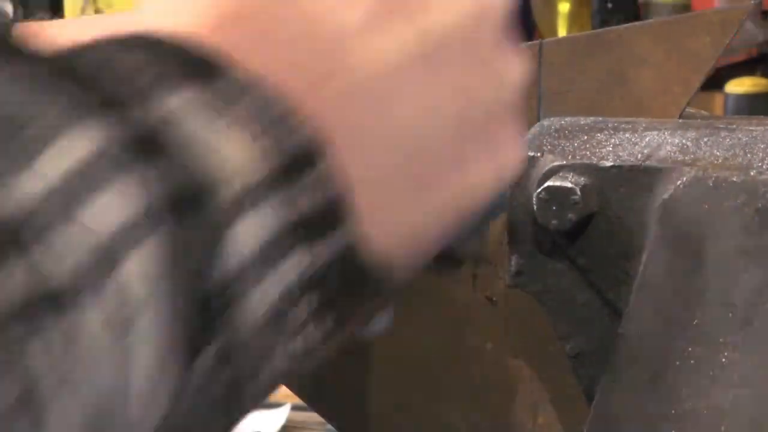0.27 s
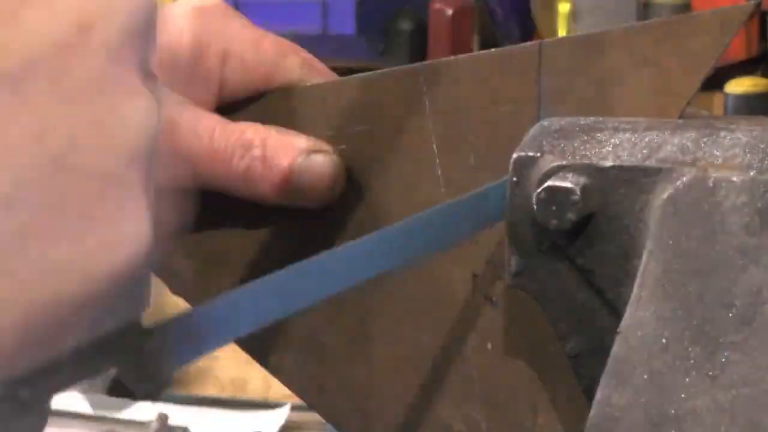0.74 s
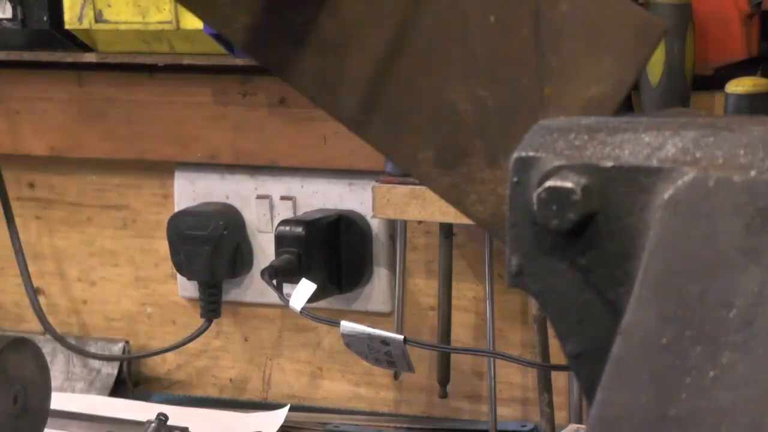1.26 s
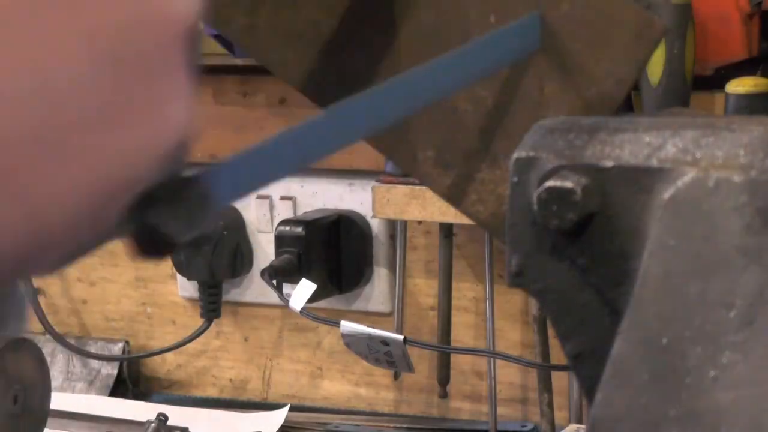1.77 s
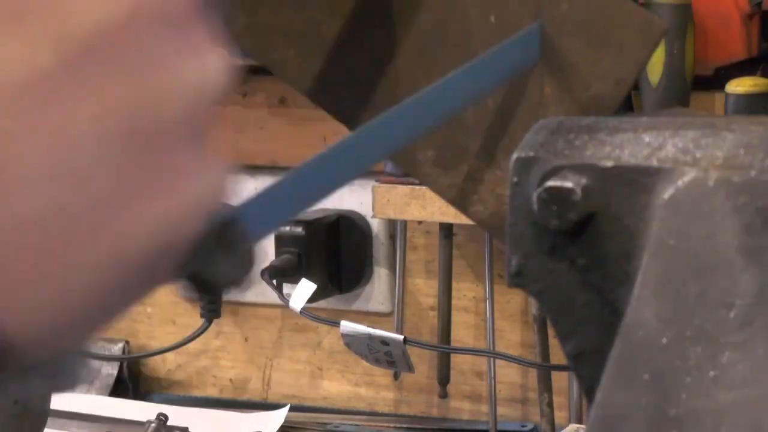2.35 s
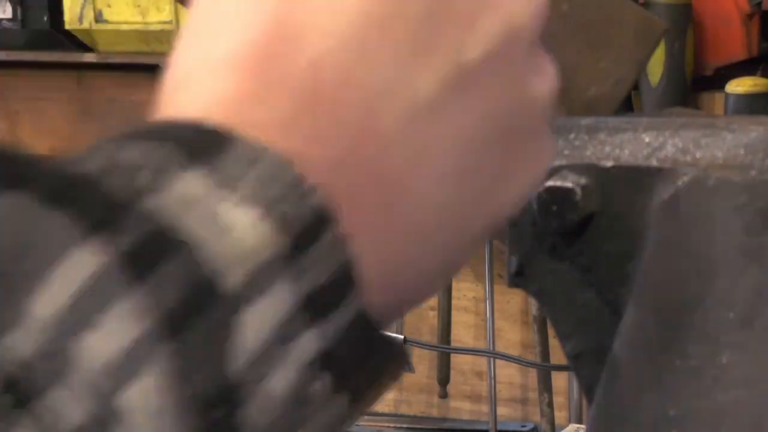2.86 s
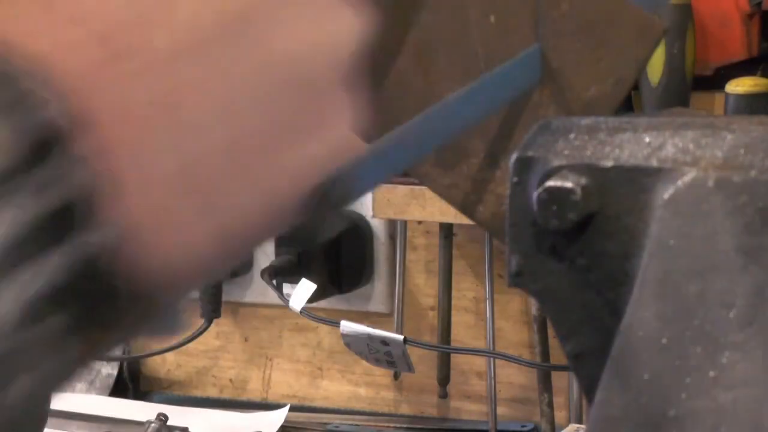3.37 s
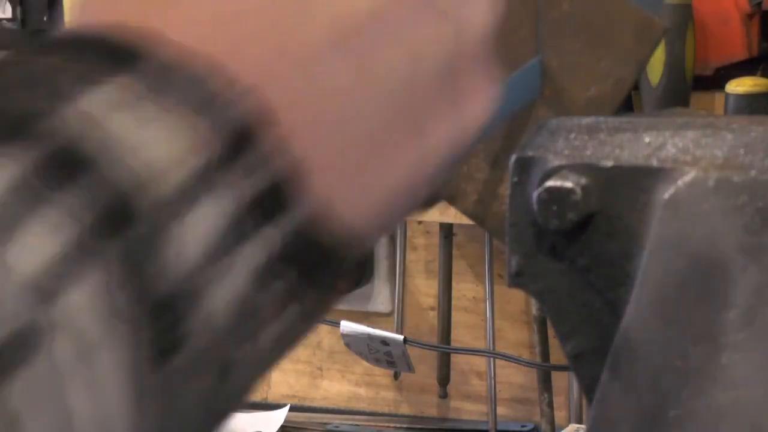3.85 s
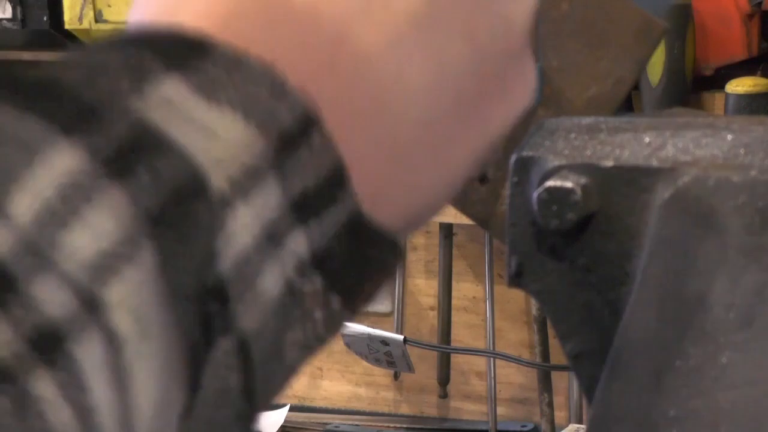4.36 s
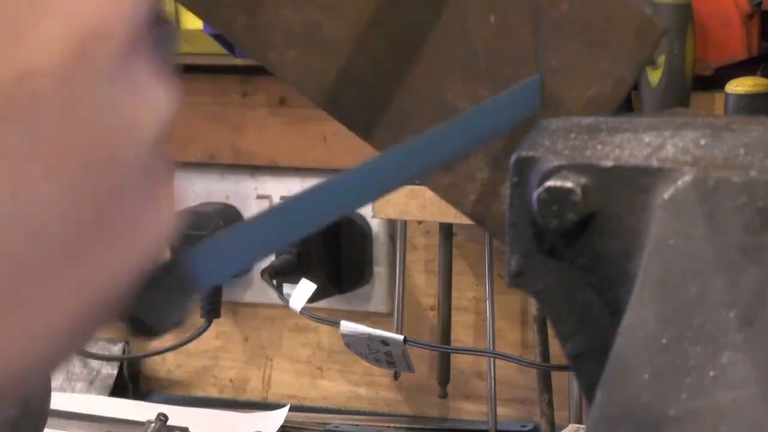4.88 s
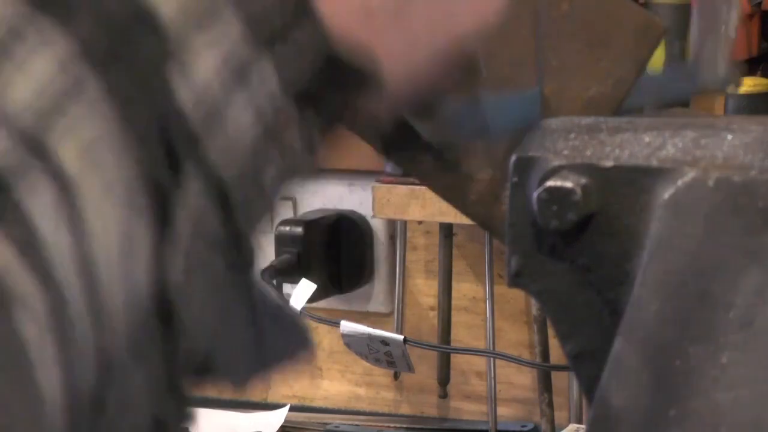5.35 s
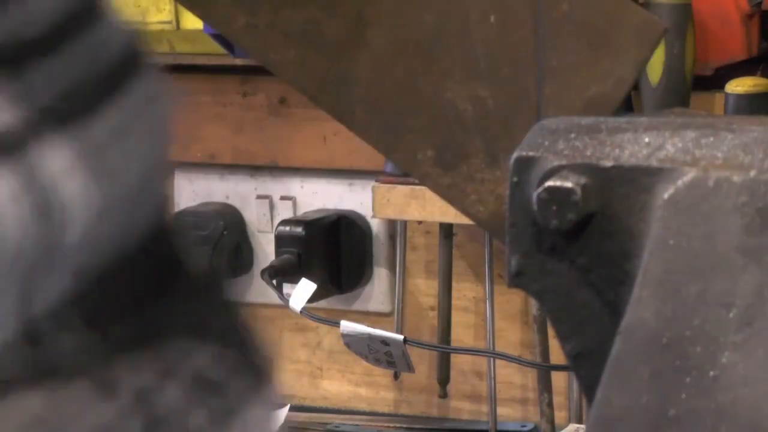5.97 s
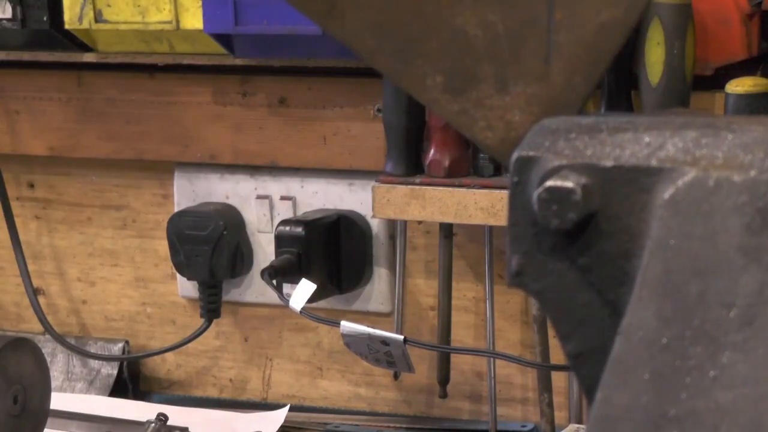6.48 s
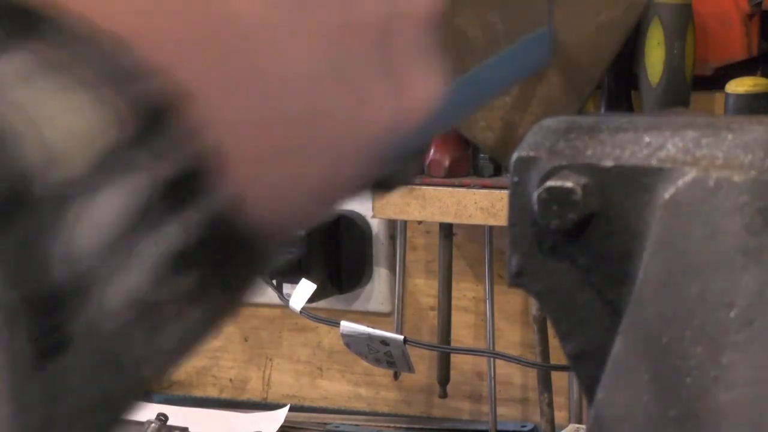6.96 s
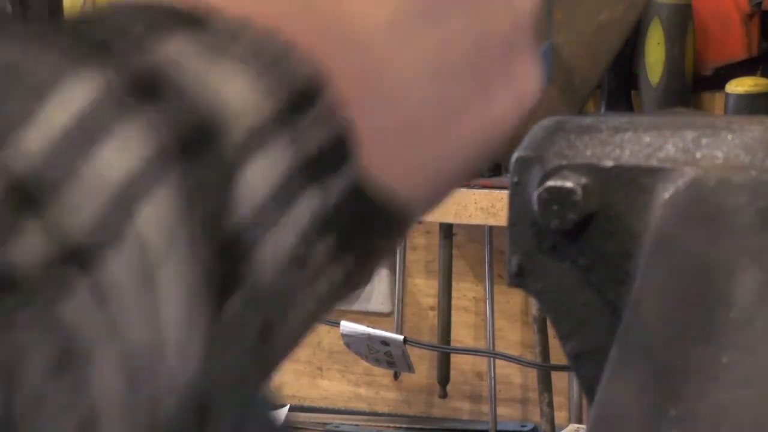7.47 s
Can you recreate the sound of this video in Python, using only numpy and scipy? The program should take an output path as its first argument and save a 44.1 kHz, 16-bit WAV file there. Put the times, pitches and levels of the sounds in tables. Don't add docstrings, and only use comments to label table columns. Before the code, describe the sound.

Very fast hacksaw strokes on a steel plate in a vise make a fluttering, ringing rasp of about thirty puffs a second, pitch not raised. After a second it stops for knocks and sharp ticks, restarts with trial strokes, then saws on brightly for over four seconds. The plate rings briefly, is handled with thuds and clacks, and a new cut begins. Close stereo microphone, sound leaning left, small dry workshop.

```python
import sys
import numpy as np
from scipy import signal
from scipy.fft import rfft, irfft
from scipy.io import wavfile
from scipy.ndimage import uniform_filter1d

SR = 44100
rng = np.random.default_rng(int(sys.argv[2]) if len(sys.argv) > 2 else 0)


def master(y):
    cut = np.clip(np.atleast_2d(y).T, -1, 1)
    pcm = np.round(cut * 32767)
    wavfile.write(sys.argv[1], SR, pcm.astype(np.int16))


def to_linear_factor(level_db):
    exponent = np.asarray(level_db, float) / 20
    return 10 ** exponent


N = 340452
SPLIT_HZ = 2600


def unit(x):
    return x / np.sqrt(np.mean(np.abs(x) ** 2))


def read(table, hz):
    f, v = np.transpose(table)
    return np.interp(np.log(np.maximum(hz, 1)), np.log(f), v)


def walk(n, rate):
    hold = int(SR / rate)
    steps = np.repeat(rng.standard_normal(n // hold + 1), hold)
    return 1.2 * uniform_filter1d(steps, hold)[:n]


def grit(n, scatter_db):
    bite_db = scatter_db * np.minimum(rng.exponential(size=n), 4)
    return rng.standard_normal(n) * to_linear_factor(bite_db)


# (frequency [Hz], likeness [0-1])
ALIKE = [(60, .3), (250, .8), (1500, .1), (7500, .15), (8800, .7), (16000, .62)]
# (frequency [Hz], level [dB])
LEFT_DB = [(60, -2), (200, -3), (500, -6.5), (2400, -9.5), (4400, -5), (9000, -2), (13000, -4)]


def hiss(colour, scatter_db, ripple_db):
    hz = np.fft.rfftfreq(N, 1 / SR)
    ripple = ripple_db * walk(len(hz), rate=30) * (hz > SPLIT_HZ)
    alike = np.clip(read(ALIKE, hz), 0, 1)
    mid = rfft(unit(grit(N, scatter_db)))
    side = rfft(unit(grit(N, scatter_db)))
    sign = np.array([[1], [-1]])
    pair = np.sqrt(1 + alike) * mid + sign * np.sqrt(1 - alike) * side
    level_db = read(colour, hz) + ripple + sign * read(LEFT_DB, hz) / 2
    return unit(irfft(pair * to_linear_factor(level_db), N))


# (frequency [Hz], phase [rad])
LEFT_LEAD = [(100, .2), (800, 1.3), (1900, .4), (2300, -1.2), (4000, 1.1), (8000, 0)]


def ears(z, hz):
    half = to_linear_factor(read(LEFT_DB, hz) / 2)
    lead = np.exp(1j * read(LEFT_LEAD, hz))
    return np.real([z * half * lead, z / half])


def ring(push, hz, width_hz, steady):
    turn = np.exp(2j * np.pi * np.cumsum(hz) / SR)
    z = signal.lfilter([1], [1, -np.exp(-np.pi * width_hz / SR)], push / turn)
    z = signal.lfilter([1], [1, -np.exp(-5 * np.pi * width_hz / SR)], z)
    swing = uniform_filter1d(np.abs(z), int(SR / width_hz / 2))
    return unit(z * turn / swing ** np.clip(steady, 0, 1))


def puffs(centre_s, spread_ms, db, stretch, square, skew):
    power, k = np.full(N, 1e-18), np.arange(-3000, 3000)
    for centre, spread, gain in zip(centre_s, spread_ms, to_linear_factor(db)):
        at = int(centre * SR) + k
        u = k / SR * 1000 / (stretch * spread) + skew
        u = u / np.where(u < 0, 1 - skew, 1 + skew)
        ok = (at >= 0) & (at < N)
        power[at[ok]] += (gain ** 2 * np.exp(-np.abs(u) ** square))[ok]
    return np.sqrt(power)


# (far turn-round [s], bright ring on push [dB], bright on pull [dB],
# deep ring on push [dB], deep on pull [dB])
TIP_CYCLES = [(0.041, -39.5, -35.5, -39, -35.0), (0.106, -41, -34, -43, -33),
              (0.171, -35, -36, -37.5, -35.5), (0.236, -45.5, -36, -44, -34), (0.303, -44, -40, -41, -32.5),
              (0.367, -38, -33, -36.5, -31.5), (0.4313, -37.5, -40, -40, -31.5),
              (0.499, -39, -36.5, -40, -30), (0.563, -37, -38, -38.5, -34),
              (0.6287, -37.5, -32.5, -38, -30), (0.692, -37.5, -33, -41, -34.5),
              (0.758, -42, -36, -35.5, -34.5), (0.824, -42, -38, -41, -36), (0.889, -44.5, -36.5, -41, -30),
              (0.949, -42.5, -45, -45, -46.5)]
FRESH_CYCLES = [(1.839, -40, -38.5, -35, -26), (1.898, -34.5, -29.5, -30.5, -39),
                (2.035, -43, -37.5, -32, -31), (2.096, -34.5, -35, -38.5, -33),
                (2.158, -36, -40, -37, -30.5), (2.217, -34, -34, -34, -32), (2.277, -37.5, -39, -35, -32.5),
                (2.34, -40.5, -36, -36, -32), (2.402, -40, -37.5, -33.5, -30),
                (2.461, -42, -35.5, -28.5, -33), (2.52, -39, -34, -28.5, -31.5),
                (2.58, -37, -39.5, -37, -35), (2.641, -39.5, -38.5, -35.5, -30.5),
                (2.7, -38, -38, -34.5, -35), (2.7587, -40.5, -39, -35.0, -32),
                (2.82, -39.5, -33, -38.5, -33), (2.877, -37.5, -37, -33, -32),
                (2.937, -42.5, -35, -32.5, -32), (2.992, -38.5, -39.5, -29.5, -33.5),
                (3.049, -42, -38, -31.5, -34), (3.105, -38.5, -35.5, -29.5, -30),
                (3.1611, -32.5, -35.5, -34, -32), (3.219, -35.5, -38.5, -34.5, -30.5),
                (3.276, -36, -38.5, -32.5, -31)]
DEEPER_CYCLES = [(3.333, -32, -32, -35, -32), (3.388, -36, -30, -32.5, -31),
                 (3.447, -29.5, -30, -31, -29.5), (3.51, -35, -30.5, -27.5, -33),
                 (3.574, -33, -30, -27, -42), (3.631, -35, -31.5, -30, -34.5),
                 (3.699, -33, -31, -31.5, -30), (3.76, -31, -31.0, -28.5, -33.5),
                 (3.823, -30.5, -29, -32, -35.5), (3.883, -33, -31, -30.5, -37.5),
                 (3.942, -29.5, -32, -32, -33.5), (4.006, -31, -31.5, -33.5, -34),
                 (4.0668, -29.5, -32.5, -32, -36.5)]
LONG_CYCLES = [(4.317, -28.0, -28.0, -35.5, -43.5), (4.377, -28.5, -31, -41, -44.5),
               (4.438, -31.5, -28, -36.5, -39), (4.4987, -32.5, -29.5, -31.5, -33.5),
               (4.56, -33, -26, -28, -41.5), (4.621, -32, -29.5, -33.5, -35),
               (4.682, -30, -28, -33.5, -43.0), (4.744, -34, -32, -31, -37),
               (4.8062, -32, -28.5, -35, -37.0), (4.867, -31, -30.5, -35, -35),
               (4.928, -31, -29, -28, -30.5), (4.99, -33, -30, -30.5, -35.5), (5.052, -35.5, -32, -29, -32),
               (5.1142, -31.5, -34.5, -32, -30.5), (5.176, -31, -36, -33.5, -31),
               (5.238, -32.5, -31, -29, -32), (5.2995, -33.5, -30.5, -31, -37.5),
               (5.364, -32.5, -34, -36.5, -34.5), (5.422, -32, -32, -39.0, -34.5),
               (5.489, -33, -34.5, -37, -34), (5.6746, -32, -29.5, -39, -35),
               (5.7383, -29.5, -28.5, -39.5, -38.5), (5.801, -28.5, -33, -44, -39),
               (5.865, -31, -33, -46, -36.5), (5.9264, -31.5, -34.5, -37, -37.5),
               (5.991, -31, -29, -40, -37.5)]
NEW_CYCLES = [(7.1088, -35, -30, -39.5, -39.5), (7.1634, -31, -28, -34, -39),
              (7.2195, -30, -30.5, -35, -37), (7.2756, -29.5, -30.5, -39, -41.5),
              (7.3368, -30, -31.5, -43, -40), (7.397, -30.5, -30, -45, -44), (7.455, -31, -31.5, -37, -40),
              (7.5145, -31.5, -35, -44, -42.5), (7.572, -32, -33, -42.5, -40.5),
              (7.631, -30, -30, -43.5, -45), (7.6906, -31, -34, -46, -38.5)]
# (centre [s], spread [ms], bright ring [dB], deep ring [dB])
LONE_STROKES = [(1.577, 3.4, -42.5, -29.5), (1.66, 3.3, -69, -45.5), (1.789, 2.05, -51, -33.5),
                (0.002, 3.5, -49, -48), (1.968, 3.5, -46, -40), (1.989, 4.4, -34, -32.5),
                (4.106, 4, -30, -38.5), (4.229, 4.7, -31, -40.5), (4.267, 5.6, -31, -34.5),
                (5.528, 3.4, -31.5, -34.5), (6.93, 4.8, -51, -56.5), (6.968, 3.7, -44, -39),
                (7.006, 5.4, -52, -35.5), (7.066, 3.5, -34, -43)]
PUSH_BEFORE_S, PULL_AFTER_S = 0.014, 0.014
PUSH_MS, PULL_MS, TIP_PULL_MS = 5.59, 4.59, 3.08
USUAL_CYCLE_S, LONGER_MS_PER_S = 0.062, 110
USUAL_DB, LONGER_MS_PER_DB = -31.5, 0.08


def strokes():
    cycles = TIP_CYCLES + FRESH_CYCLES + DEEPER_CYCLES + LONG_CYCLES + NEW_CYCLES
    turn, push_db, pull_db, push_deep_db, pull_deep_db = np.transpose(cycles)
    gap = np.diff(turn)
    slow = LONGER_MS_PER_S * np.clip(gap - USUAL_CYCLE_S, -.01, .015) * (gap < .1)
    push_ms = PUSH_MS + np.r_[0, slow] + LONGER_MS_PER_DB * (push_db - USUAL_DB)
    pull_ms = np.where(turn < 1, TIP_PULL_MS, PULL_MS) + np.r_[slow, 0]
    push = [turn - PUSH_BEFORE_S, push_ms, push_db, push_deep_db, -np.ones_like(turn)]
    pull = [turn + PULL_AFTER_S, pull_ms, pull_db, pull_deep_db, np.ones_like(turn)]
    lone = np.vstack([np.transpose(LONE_STROKES), np.zeros(len(LONE_STROKES))])
    rows = np.hstack([push, pull, lone])
    return rows[:, np.argsort(rows[0])]


def shared(x):
    return x / np.sqrt(uniform_filter1d(np.mean(x, axis=0) ** 2, int(.014 * SR)))


JAW_ECHO, JAW_LAG = .33, 18


def patchy(x, db):
    low = signal.sosfilt(signal.butter(2, 1500, fs=SR, output="sos"), x)
    up = signal.sosfilt(signal.butter(2, 6000, fs=SR, output="sos"), x)
    treble = x - up
    treble = treble + JAW_ECHO * np.roll(treble, JAW_LAG, axis=1)
    return sum(part * to_linear_factor(db * walk(N, rate=45)) for part in (low, up - low, treble))


# (frequency [Hz], width [Hz], level at start [dB], level at end [dB] if it changes)
NARROW_TIP = [(788, 180, -28), (1100, 100, -28), (1878, 85, -5), (2496, 90, -20, -12), (3620, 320, -7),
              (4490, 74, -5), (4900, 70, -14), (5240, 90, -12)]
TRIAL_CUT = [(958, 45, 3), (1510, 62, -18), (4520, 290, -16)]
FRESH_CUT = [(942, 40, 0), (1250, 110, -24), (2345, 70, -21, -11), (3400, 80, -14, -18), (3775, 140, -9),
             (4850, 110, -8, -13), (6350, 170, -18, -24), (7700, 110, -14, -22)]
DEEPER_CUT = [(930, 55, -2), (800, 120, -20), (2302, 45, 1, -4), (3790, 46, -5), (3998, 45, -2),
              (4580, 60, -2), (4800, 80, -6, -22), (6110, 90, -26, -6), (6488, 50, -8, -26),
              (12380, 200, -26)]
LONG_CUT = [(953, 32, 1), (700, 120, -26), (1565, 70, -25), (2270, 66, -11, -21), (2905, 55, -17),
            (3385, 90, -17), (3770, 50, -6), (3990, 48, 1), (4565, 58, -3, -6), (5720, 90, -26, -9),
            (6040, 90, -2, -21), (8950, 140, -24), (11620, 140, -27), (12300, 160, -24, -31)]
AFTER_PAUSE = [(931, 40, 0), (2240, 75, -12), (2900, 52, -16), (3410, 67, -12), (3740, 50, -9),
               (3985, 50, 1), (4560, 45, -3), (5580, 250, -17), (6560, 80, -14)]
CUT_END = [(915, 42, 0), (700, 90, -18), (1570, 55, -19), (2230, 80, -16), (2890, 35, -12), (3380, 110, -9),
           (3970, 50, 0), (4540, 49, -10), (5370, 110, -11), (6470, 130, -17), (8940, 62, -14)]
NEW_CUT = [(890, 120, -19), (1570, 75, -17), (2228, 65, -8, -13), (2930, 62, 2, -5), (4055, 55, -13, 3),
           (5990, 150, -21), (8530, 190, -24)]
# (start [s], end [s], modes, rasp against ring [dB], pitch sag as slot grows [share], lean to left [dB])
CUTS = [
    (-.5, 1.07, NARROW_TIP, -1.5, 0, -1.5),
    (1.35, 1.78, TRIAL_CUT, 1.5, 0, 0),
    (1.77, 3.31, FRESH_CUT, -1.5, .02, -.3),
    (3.31, 4.18, DEEPER_CUT, -5, .006, -.7),
    (4.18, 5.6, LONG_CUT, -3.5, .006, 1),
    (5.6, 5.82, AFTER_PAUSE, -3, 0, 2.1),
    (5.82, 6.6, CUT_END, -3, .03, 1.5),
    (6.7, 8.17, NEW_CUT, -2, .03, .4),
]
# (time [s], frequency [Hz])
FLEX = [(0, 1902), (.5, 1872), (.97, 1808), (1.5, 960), (2.4, 937), (3.55, 912), (3.85, 990), (4.9, 961),
        (6.05, 916)]
# (frequency [Hz], density [dB per Hz])
RASP = [(40, -25), (330, -15.5), (800, -4.5), (1300, -7), (5000, -1), (8400, -11), (11000, -10),
        (16000, -15)]
# (frequency [Hz], gain [dB])
ON_RETURN = [(820, 7.5), (930, 1.5), (1560, 2), (2300, -4), (2900, 0.5), (3700, 1.5), (5500, -2),
             (6100, 5.5), (7500, 1.5)]
BLEND_S = .1
DRAG_SHARE, DRAG_S = 0.24, 0.0093


def saw():
    s, spread, bright_db, deep_db, pulling = strokes()
    bright = puffs(s, spread, bright_db + 0.17, stretch=1.58, square=2.33, skew=0.29)
    deep = puffs(s, spread, deep_db + 0.12, stretch=1.793, square=2.77, skew=.05)
    t, out = np.arange(N) / SR, np.zeros((2, N))
    returning = np.interp(t, s, pulling)
    flex = np.interp(t, *np.transpose(FLEX))
    for t0, t1, modes, rasp_db, sag, lean_db in CUTS:
        first = max(int((t0 - BLEND_S / 2) * SR), 0)
        last = min(int((t1 + BLEND_S / 2) * SR), N)
        cut = slice(first, last)
        n = last - first
        blend = np.sqrt(np.clip(np.minimum(t[cut] - t0, t1 - t[cut]) / BLEND_S + .5, 0, 1))
        rasp = hiss(RASP, scatter_db=2.8, ripple_db=2.2) * to_linear_factor(2.2 * walk(N, rate=260))
        low, high, depth = 0, 0, np.linspace(0, 1, n)
        for hz, width_hz, *dbs in modes:
            db = dbs[0] + (dbs[-1] - dbs[0]) * depth
            bends = abs(hz / flex[cut].mean() - 1) < .06
            track = flex[cut] if bends else hz * (1 - sag * (depth - .5))
            track = track * (1 + .006 * walk(n, rate=30))
            picked_db = (1.0 if bends else 3.0) * walk(n, rate=50) + walk(n, rate=6)
            picked_db = picked_db + (0 if bends else 3.6) * walk(n, rate=200)
            steady = .7 if hz < SPLIT_HZ else .4
            z = ring(grit(n, scatter_db=2.5), track, .7 * width_hz, steady)
            mode_db = db + picked_db + read(ON_RETURN, hz) * returning[cut]
            voice = to_linear_factor(mode_db) * np.sqrt(width_hz) * ears(z, hz)
            if hz < SPLIT_HZ:
                low = low + voice
            else:
                high = high + voice
        bite = bright[cut] ** 0.68 * deep[cut] ** 0.27
        drag = signal.lfilter([DRAG_SHARE / DRAG_S / SR], [1, 1 / DRAG_S / SR - 1], bite)
        scrape = np.hypot(bite, drag) * to_linear_factor(rasp_db - 1.35) * patchy(rasp, db=1.5)[:, cut]
        lean = to_linear_factor([[lean_db / 2], [-lean_db / 2]])
        out[:, cut] += lean * blend * (shared(low) * deep[cut] + shared(high) * bright[cut] + scrape)
    return out


# (frequency [Hz], density [dB per Hz])
SHOP = [(30, -11), (150, -3.5), (500, -13), (2500, -31), (16000, -38)]


def room_tone():
    return to_linear_factor(-67) * hiss(SHOP, scatter_db=1.5, ripple_db=2)


def shop_echo(x, t60, delay_s):
    t = np.arange(int(.25 * SR)) / SR
    tails = rng.standard_normal((2, len(t))) * to_linear_factor(-60 * t / t60) * (t > delay_s)
    return signal.fftconvolve(x, tails / np.sqrt(np.sum(tails ** 2) / 2), axes=1)[:, :N]


# (time [s], peak level [dB])
SNAGS = [(0.1156, -29.5), (0.376, -26), (0.6155, -24.5), (0.7023, -22), (1.1124, -37), (1.2685, -34),
         (1.5713, -23), (1.9824, -33), (2.4688, -19), (2.7691, -24), (3.4002, -23), (3.5164, -25),
         (3.7988, -24), (4.0751, -21), (4.1036, -21), (4.2223, -30), (4.2612, -28), (4.6284, -18),
         (5.796, -19), (5.6516, -31), (5.8386, -27), (5.9349, -20), (6.7236, -38), (6.9611, -21),
         (7.0638, -16), (7.0908, -34)]


def snagging():
    s, db = np.transpose(SNAGS)
    cracks = puffs(s + 0.0012, np.full(len(s), .6), db - 4.5, stretch=1, square=2.2, skew=.3)
    return hiss(RASP, scatter_db=3.0, ripple_db=1.5) * cracks


def friction(rows, width_hz, steady):
    out, k = np.zeros((2, N)), np.arange(-3000, 3000)
    for s, spread_ms, db, hz in rows:
        z = ring(grit(len(k), scatter_db=3.0), np.full(len(k), 1. * hz), width_hz, steady)
        swell = np.exp(-np.abs(k / SR * 1000 / spread_ms) ** 2.3 / 2)
        out[:, int(s * SR) + k] += ears(np.sqrt(2) * z, hz) * to_linear_factor(db) * swell
    return out


# (centre [s], spread [ms], level [dB], frequency [Hz])
SQUEALS = [(.578, 4.7, -38, 1080), (2.41, 4.6, -38.5, 1327), (3.175, 6.6, -39.5, 1416),
           (4.738, 5, -39.5, 1514), (4.8, 4.6, -38, 1560), (4.86, 4.8, -36.5, 1570), (4.796, 5, -37, 2870),
           (4.854, 11, -38, 2890), (4.925, 3.8, -40, 674), (4.981, 4.5, -33.5, 2920), (4.99, 6.4, -38, 694),
           (5.045, 6.8, -41, 2890), (5.108, 4.6, -38, 2900), (5.43, 7.7, -42, 646), (5.66, 7.5, -43.5, 401),
           (5.767, 4.3, -48, 2930), (5.855, 7, -44, 1530), (5.909, 14, -35.5, 2860), (5.92, 6.3, -43, 682),
           (6.928, 6.4, -51.5, 370), (6.968, 8.5, -36.5, 380), (7.006, 5.1, -38, 377), (7.026, 5, -42, 385),
           (7.066, 3.86, -40.5, 390), (7.176, 3.3, -46, 760), (7.232, 4.6, -39, 915),
           (7.292, 4.9, -45, 844), (7.353, 5.8, -44, 835)]


def squealing():
    return friction(SQUEALS, width_hz=42, steady=1.0)


# (frequency [Hz], ..)
FREE_HZ = (650, 1577, 2900)
# (time [s], length [s], level of each free mode [dB] x 3)
LIFTS = [
    (.965, 0.047, -66, -79, -74),
    (4.125, 0.14, -63, -61.5, -90),
    (5.545, 0.091, -92.5, -70, -66),
    (6.02, 0.1, -45.5, -56, -46),
]


def singing():
    out = np.zeros((2, N))
    for s, length, *dbs in LIFTS:
        t = np.arange(int(length * SR)) / SR
        fade = np.clip(np.minimum(t / 0.0026, (length - t) / 0.0083), 0, 1)
        for hz, db, t60 in zip(FREE_HZ, dbs, (1.5, .7, .3)):
            cycles = hz * (t + .3 * t ** 2 * (hz < 1000)) + rng.random()
            z = to_linear_factor(db - 60 * t / t60) * fade * np.exp(2j * np.pi * cycles)
            out[:, int(s * SR):int(s * SR) + len(t)] += ears(np.sqrt(2) * z, hz)
    return out


# (centre [s], spread [ms], thud [dB],
# clack [dB], clack frequency [Hz])
KNOCKS = [(1.033, 3.5, -47, -46, 1050), (1.045, 4.7, -49, -42, 3770), (1.065, 6.4, -50, -43, 4570),
          (1.113, 3.6, -72, -53, 5040), (1.136, 2.3, -54, -61, 1500.0), (1.248, 5, -43, -44.5, 755),
          (1.27, 2.2, -41, -32.5, 1490), (1.294, 3.5, -41.5, -29.5, 3600),
          (1.505, 7.4, -66, -52, 1180), (1.523, 1.1, -59, -43, 1220), (1.536, 2, -53, -45, 940),
          (1.555, 1.2, -46, -45, 960),
          (6.103, 5.3, -40.5, -37, 520), (6.132, 3.1, -44, -38.5, 3530),
                (6.158, 4.9, -55, -49, 3060), (6.195, 3.7, -59, -55, 2930.0), (6.21, 0.96, -48, -31.5, 690),
                (6.221, 2.4, -38.5, -40.5, 714), (6.278, 6.3, -52.5, -60, 715),
                (6.297, 3.4, -63, -59, 4270), (6.416, 1.7, -57, -75, 714), (6.52, 3.1, -58.5, -89, 698),
                (6.642, 2.3, -61.5, -65, 1370.0), (6.728, 6.1, -45.5, -39, 3640),
                (6.755, 6.2, -51, -42.5, 4650), (6.796, 4, -41, -41.5, 3550), (6.821, 1.7, -35.5, -37, 680),
                (6.969, 3.3, -46, -30.5, 4300), (7.007, 2.3, -49, -25, 4070), (7.023, 3.5, -44, -34, 4350)]


def handling():
    s, spread, thud_db, clack_db, clack_hz = np.transpose(KNOCKS)
    nearest = np.searchsorted((s[1:] + s[:-1]) / 2, np.arange(N) / SR)
    bench_hz = (150 + 150 * rng.random(len(s)))[nearest]
    thud = ears(ring(grit(N, scatter_db=4.0), bench_hz, width_hz=190, steady=1.0), 450)
    scuff_colour = [(250, -13.5), (700, 0), (4000, -3.5), (8000, -13.5), (16000, -27.5)]
    scuff = hiss(scuff_colour, scatter_db=3.0, ripple_db=4.0)
    clack = ears(ring(grit(N, scatter_db=0.5), clack_hz[nearest], width_hz=270, steady=0.36), 2500)
    breakup = to_linear_factor(3.5 * walk(N, rate=350))
    thuds = thud * puffs(s, spread, thud_db + 7.0, stretch=0.56, square=0.97, skew=0.5)
    thuds = signal.sosfilt(signal.butter(1, 60, "high", fs=SR, output="sos"), thuds)
    contact = to_linear_factor(-4) * scuff + to_linear_factor(-6) * clack
    return thuds + contact * breakup * puffs(s, spread, clack_db, stretch=0.95, square=1.17, skew=0.097)


# (time [s], peak level [dB], ring frequency [Hz])
TICKS = [(1.052, -38, 3660), (1.065, -31, 4500), (1.268, -29.5, 1470), (1.293, -18.5, 3550),
         (1.503, -39, 1190), (1.523, -35, 1230), (1.535, -39, 969), (6.096, -34, 2180), (6.207, -34, 1130),
         (6.414, -48, 650), (6.258, -52, 620), (6.283, -52, 700), (6.331, -56, 1530), (6.519, -52, 601),
         (6.639, -50, 1360), (6.711, -38, 1490), (6.724, -32, 3850), (6.796, -29, 3400), (6.819, -38, 993)]


def ticks():
    out, t = np.zeros((2, N)), np.arange(600) / SR
    for s, db, hz in TICKS:
        crack = rng.standard_normal((2, len(t))) * to_linear_factor(-60 * t / 0.0021) * [[1.3], [.8]]
        z = np.exp(2j * np.pi * hz * t) * to_linear_factor(-60 * t / 0.018)
        out[:, int(s * SR):int(s * SR) + len(t)] += to_linear_factor(db) * (0.26 * crack + 0.64 * ears(z, hz))
    return out


# (centre [s], spread [ms], level [dB])
RUSTLES = [(1.054, 2, -35), (1.075, 9.9, -56), (1.114, 5, -41.5), (1.18, 40, -65), (1.235, 8, -66),
           (6.11, 3, -56), (6.132, 4, -57), (6.338, 5, -70), (6.595, 1.1, -55), (6.7, 10, -66),
           (6.756, 4.4, -63), (6.857, 4, -58), (6.86, 30, -70)]


def rustling():
    colour = [(1500, -24), (4500, -1), (8000, -6), (11000, 0.5), (16000, -1.5)]
    air = hiss(colour, scatter_db=4.0, ripple_db=0.5)
    return air * puffs(*np.transpose(RUSTLES), stretch=0.86, square=2, skew=0)


# (centre [s], spread [ms], level [dB], frequency [Hz])
SLIDES = [
    (1.19, 30, -66.5, 1500),
    (1.38, 10, -69.5, 1250),
    (3.335, 25, -47.5, 370),
    (3.36, 13, -44.5, 1590),
    (6.45, 20, -69.5, 1093),
    (6.68, 19, -67.5, 1450),
]


def sliding():
    return friction(SLIDES, width_hz=103, steady=.3)


def scene():
    near = saw() + snagging() + squealing() + handling() + ticks() + rustling() + sliding()
    echo = to_linear_factor(-16) * shop_echo(near, t60=.075, delay_s=.003)
    return near + singing() + echo + room_tone()


def roll_off(x):
    return signal.sosfilt(signal.butter(12, 16470, fs=SR, output="sos"), x)


def record(dry):
    top_cut = signal.ellip(10, .2, 70, 15760, fs=SR, output="sos")
    return roll_off(signal.sosfilt(top_cut, dry))


dry = scene()
out = record(dry)
master(out)
```